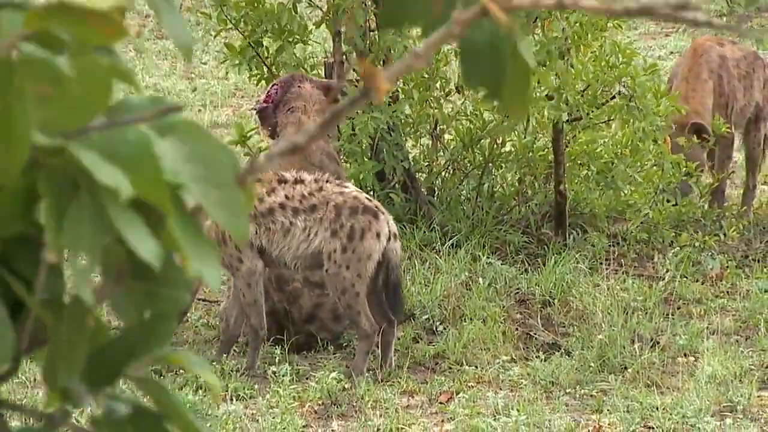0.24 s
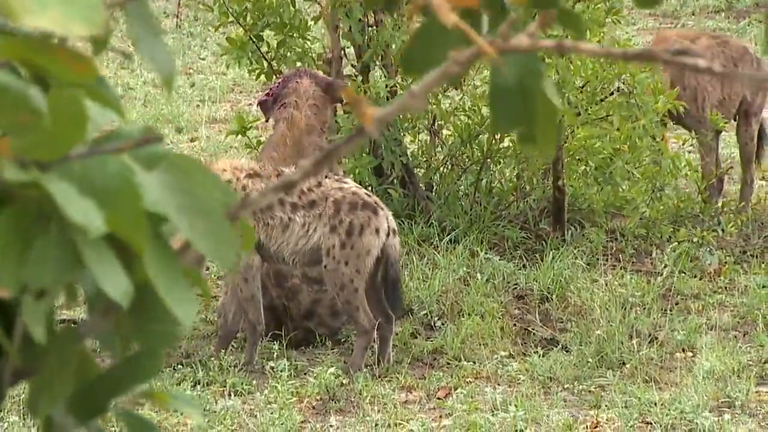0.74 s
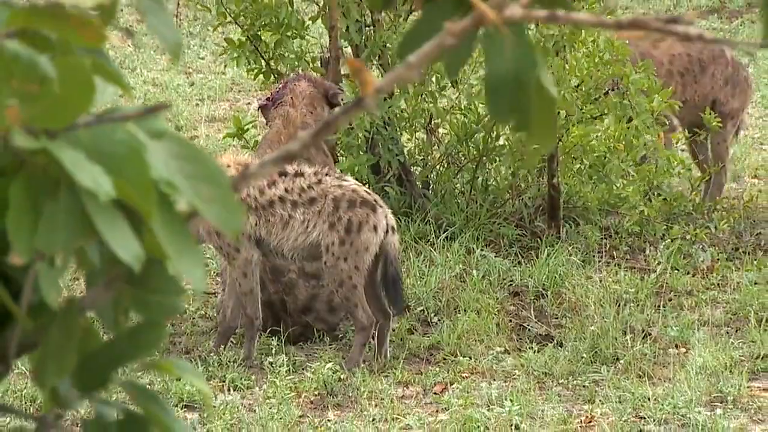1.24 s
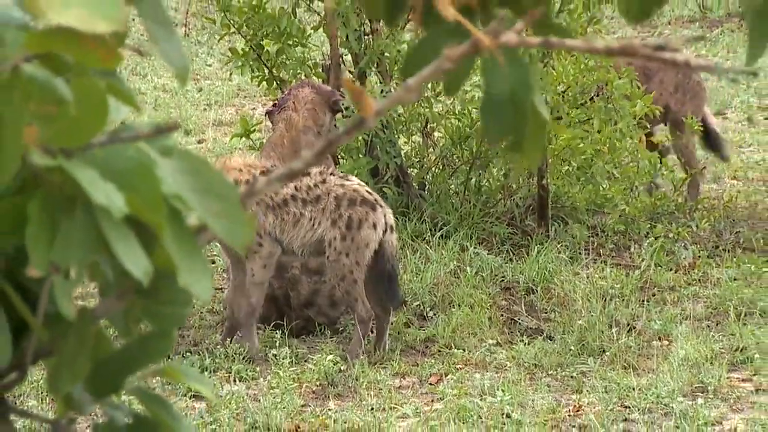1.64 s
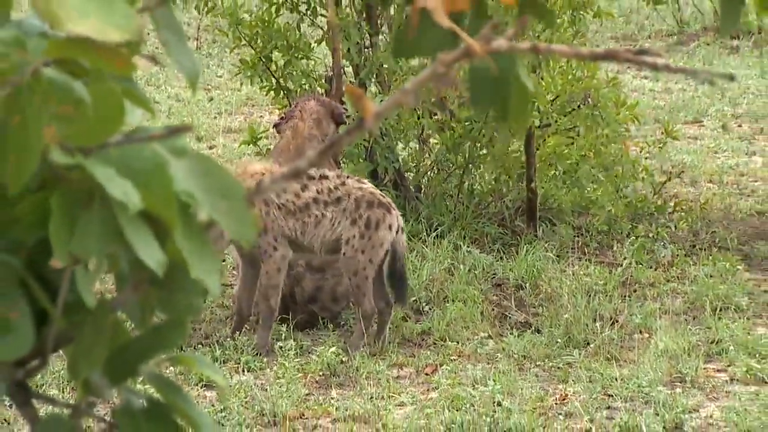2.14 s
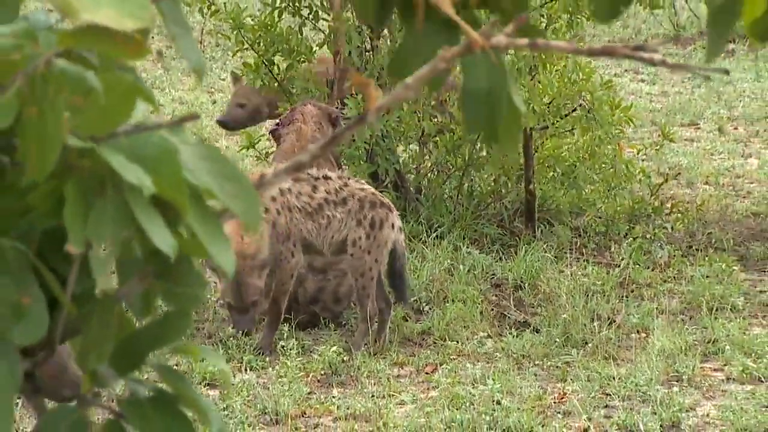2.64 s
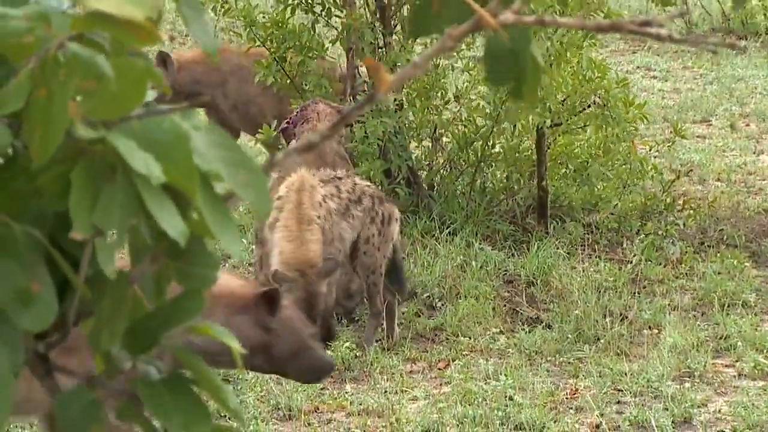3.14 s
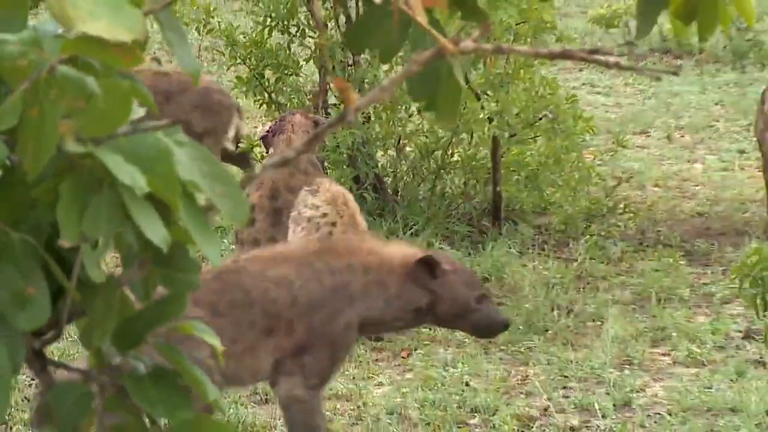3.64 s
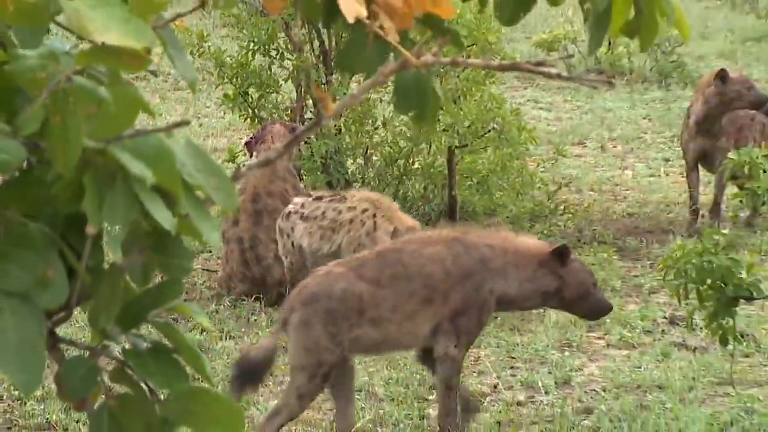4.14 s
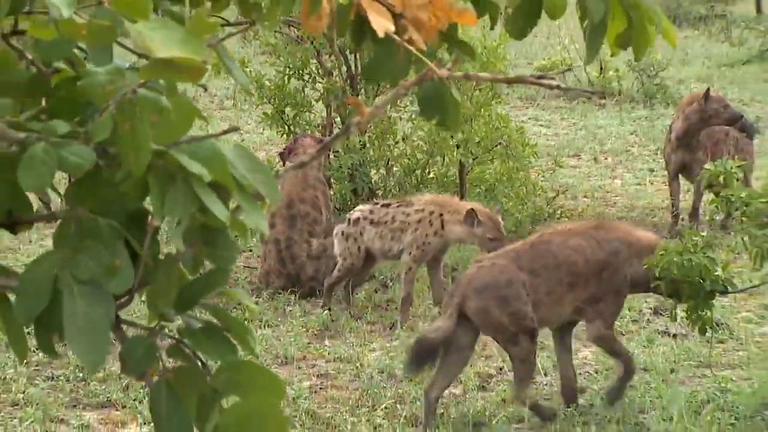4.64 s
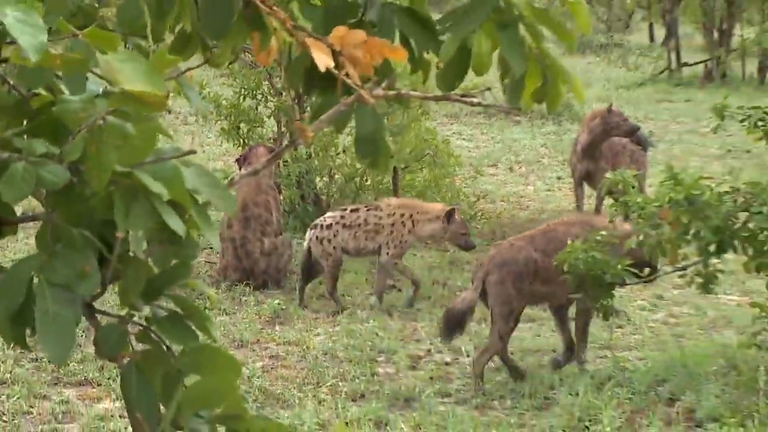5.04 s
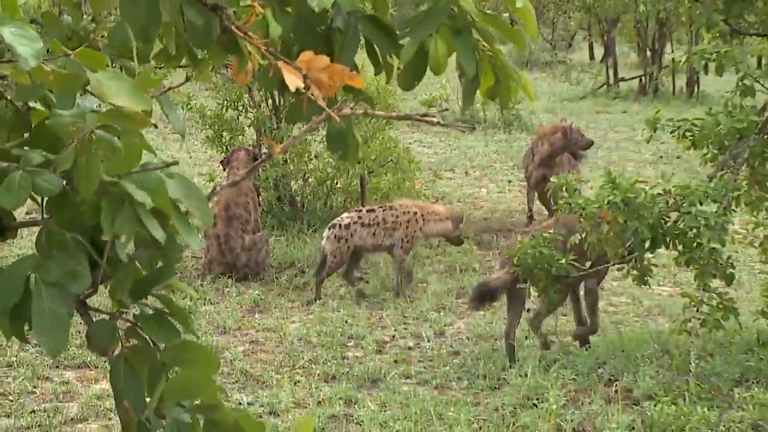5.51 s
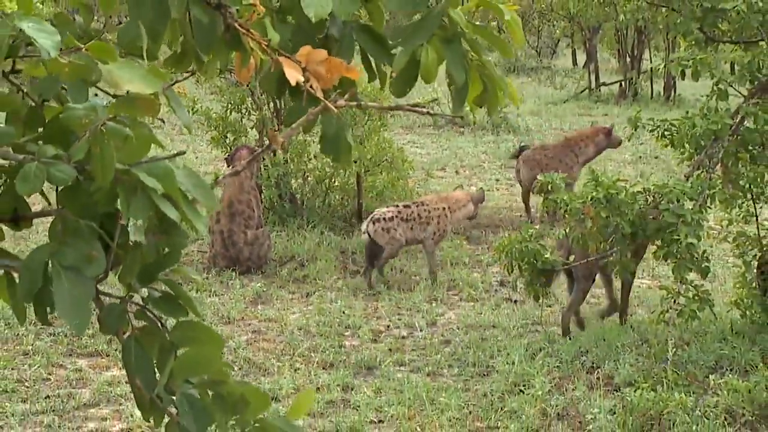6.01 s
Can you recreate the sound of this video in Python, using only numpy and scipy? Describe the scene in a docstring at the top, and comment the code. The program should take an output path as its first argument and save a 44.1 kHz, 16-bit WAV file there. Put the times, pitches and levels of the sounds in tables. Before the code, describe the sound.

A low vehicle rumble and soft breeze open outdoors with small knocks close to the microphone. At about one second a spotted hyena gives one long, very loud whoop, sliding up, holding a smooth, almost falsetto tone for well over a second, then dropping abruptly. A faint bird trill hides under its start. Afterwards bumps, taps, leaf rustle and a dry rasp come close, with a tiny chip and whistle.

```python
"""A spotted hyena gives one long whoop in open bush, close to a vehicle that rumbles low.
The call is a few partials that rise, hold on two nearly pure tones and drop; it drives the limiter.
Near the microphone noise bursts tap and gliding bumps thump; friction through resonances rasps at the end.
Small birds, set back by more echo, trill, chip and whistle as swept sines.
Behind them lie bands of flickering noise: rumble, breeze and leaves that rustle, hiss and crackle."""
import sys
import numpy as np
from scipy import signal
from scipy.io import wavfile
from scipy.ndimage import uniform_filter1d, minimum_filter1d

SR = 44100
rng = np.random.default_rng(int(sys.argv[2]) if len(sys.argv) > 2 else 0)


def persist_wave(psi):
    """Save psi, clipped to +-1, as 16-bit WAV."""
    counts = np.round(np.clip(psi, -1, 1) * 32767).astype(np.int16)
    wavfile.write(sys.argv[1], SR, np.atleast_2d(counts).T)


N = 276507
TIME = np.arange(N) / SR


def from_db(db):
    """Decibels to gain."""
    return 10 ** (np.asarray(db) / 20)


def rms_one(x):
    """Scale to rms 1."""
    return x / np.sqrt(np.mean(x ** 2) + 1e-20)


def in_time(rows):
    """Each column of a curve at every sample."""
    s, *columns = np.transpose(rows)
    return [np.interp(TIME, s, c) for c in columns]


def during(rows, fade_s=0.0073):
    """1 while a curve lasts, with short fades."""
    fade_in = np.clip((TIME - rows[0][0]) / fade_s, 0, 1)
    fade_out = np.clip((rows[-1][0] - TIME) / fade_s + 1, 0, 1)
    return fade_in * fade_out


def swells(rows):
    """For each level column, the gain of bell-shaped swells that add in power."""
    gains = []
    for k in range(2, len(rows[0])):
        power = sum(from_db(row[k]) ** 2 * np.exp(-2 * (2 * (TIME - row[0]) / row[1]) ** 2) for row in rows)
        gains.append(np.sqrt(power))
    return gains


def drift(rate):
    """Slow chance of rms 1: noise through a double low-pass; a higher rate (Hz) moves faster."""
    step = 40   # samples between the points that are joined by straight lines
    r = np.exp(-2 * step * np.pi * rate / SR)
    settle = 2000
    white = rng.standard_normal(N // step + settle + 2)
    slow = signal.lfilter([1], [1, -2 * r, r * r], white)[settle:]
    return np.interp(np.arange(N) / step, np.arange(len(slow)), rms_one(slow))


def band(x, low_hz, high_hz, order=2):
    """Butterworth band-pass."""
    edges_hz = [low_hz, min(high_hz, .45 * SR)]
    return signal.sosfilt(signal.butter(order, edges_hz, "band", fs=SR, output="sos"), x)


def resonance(x, hz, width_hz):
    """One resonance with gain 1 on top."""
    r = np.exp(-np.pi * width_hz / SR)
    feedback = [1, -2 * r * np.cos(2 * np.pi * hz / SR), r * r]
    return signal.lfilter(np.array([1, 0, -1]) * (1 - r * r) / 2, feedback, x)


def add(out, s, sound):
    """Mix a short sound in at a time."""
    at = int(s * SR)
    out[at:at + len(sound)] += sound[:N - at]


def coloured_noise(spectrum, patchy_db, flicker_rate):
    """Bands of noise up to half an octave wide, each flickering on its own; rms 1."""
    hz, level_db = np.transpose(spectrum)
    edges = np.geomspace(hz[0], hz[-1], int(2 * np.log2(hz[-1] / hz[0])) + 2)
    white, out = rng.standard_normal((2, N + SR)), 0
    for k, (low, high) in enumerate(zip(edges, edges[1:])):
        band_db = np.interp(np.log(low * high) / 2, np.log(hz), level_db)
        noise = band(white[k % 2], low, high, order=3)[SR:]   # the filter settles for a second first
        out = out + noise * from_db(band_db + patchy_db * drift(flicker_rate))
    return rms_one(out)


# colour that throat, mouth and ground give the partials as they glide: (frequency [Hz], gain [dB])
THROAT_COLOUR = [(235, -28.5), (325, -13), (385, -12), (470, -16), (530, -23), (755, -21), (792, -12.5),
                 (828, -9.5), (910, -46.5), (1120, -33.5), (1185, -38.5), (1230, -36), (1360, -28.5),
                 (1540, -52), (1650, -38.5)]


def throat_db(hz):
    """Gain of the throat at a frequency, straight lines over log frequency."""
    points_hz, db = np.transpose(THROAT_COLOUR)
    return np.interp(np.log(hz), np.log(points_hz), db)


# the whoop rises, holds and drops: (time [s], pitch [Hz])
WHOOP_PITCH = [(0.905, 236.5), (0.959, 248.5), (1.089, 313.6), (1.169, 352.2), (1.239, 375.4), (1.315, 384),
               (1.495, 395.4), (1.987, 403.2), (2.317, 413.1), (2.447, 412.6), (2.577, 409.8),
               (2.707, 392.5), (2.767, 375), (2.793, 336), (2.815, 296), (2.85, 215.8)]
# how hard the animal pushes: (time [s], level [dB])
WHOOP_EFFORT = [(0.92, -4), (1.03, -5), (1.125, 1), (1.175, -3.5), (1.24, 4.5), (1.34, 0.5), (1.48, 4.5),
                (2.55, 5), (2.77, -1.5), (2.84, -7)]
# thin overtones above the second partial: (time [s], level [dB])
OVERTONE_LEVEL = [(1.0, -4.5), (1.26, 2.5), (1.44, -6.5), (1.85, 2), (2.1, -1.5), (2.45, 1), (2.65, 0),
                  (2.77, -9.5)]
PARTIAL_DB_PER_OCTAVE = -6
# the limiter-like buzz grows as the call gets louder, by this much more than the call itself
BUZZ_DB, BUZZ_DB_PER_CALL_DB = -66.5, 1.24
BUZZ_FOLLOWS = .6   # share of the overtones' swing that the buzz takes


def hyena(jitter=0.00092, shimmer_db=0.09, air_db=-48, buzz_db_per_octave=-11, buzz_spread_db=6,
          buzz_flicker_db=1.5, order=4, count=28):
    """Four partials shaped by the throat and a little air, smooth and almost falsetto;
    with them a faint buzz at each crest, as of a limiter at work."""
    (pitch,), (effort_db,) = in_time(WHOOP_PITCH), in_time(WHOOP_EFFORT)
    (overtone_db,) = in_time(OVERTONE_LEVEL)
    cycles = np.cumsum(pitch * (1 + jitter * drift(40))) / SR
    phase = 2 * np.pi * cycles

    partial_db = [throat_db(k * pitch) + PARTIAL_DB_PER_OCTAVE * np.log2(k) + (k > 2) * overtone_db
                  for k in range(1, order + 1)]
    voice = sum(np.sqrt(2) * from_db(db) * np.cos(k * phase) for k, db in enumerate(partial_db, 1))

    first = order + 1
    buzz = sum(from_db(buzz_db_per_octave * np.log2(k / first)) * np.cos(k * phase)
               for k in range(first, count + 1))
    # the limiter-like buzz varies in strength from crest to crest
    strengths = rms_one(from_db(buzz_spread_db * np.minimum(rng.standard_normal(N), 2)))
    strength = strengths[np.round(cycles).astype(int)]
    buzz_db = BUZZ_DB + BUZZ_DB_PER_CALL_DB * effort_db + BUZZ_FOLLOWS * overtone_db
    buzz_db = buzz_db + buzz_flicker_db * drift(35)
    buzz = np.sqrt(2) * buzz * strength * from_db(buzz_db)

    # the air follows the first partial
    air = rms_one(band(rng.standard_normal(N), 330, 1700)) * from_db(partial_db[0] + air_db)
    # the call gives out as the pitch drops
    dying = np.clip((WHOOP_PITCH[-1][0] - TIME) / 0.023, 0, 1)
    push = from_db(effort_db + shimmer_db * drift(90))
    return (voice + buzz + air) * push * during(WHOOP_PITCH) * dying


# taps near the microphone: (time [s], clack level [dB], clack pitch [Hz],
# snap level [dB], snap pitch [Hz], length [share of the usual])
NEAR_TAPS = [(0.0395, -20.5, 580, -38, 4360, 1.2), (0.317, -45, 1400, -42.5, 7900, .8),
             (0.372, -33, 690, -66, 3000, 1.4), (0.42, -33.5, 990, -47.5, 3600, 1.2),
             (0.469, -26, 563, -61, 3000, 0.73), (1.3126, -7.5, 1000, -20, 4200, 1.18),
             (2.6001, -16.5, 916, -49.5, 4430, 0.9), (2.675, -11.5, 760, -30, 5170, 1.02),
             (3.533, -28, 480, -60, 2500, 0.55), (3.567, -26.5, 1700, -48, 2800, .25),
             (3.998, -23.5, 520, -41.5, 9000, 1.9), (4.145, -23, 527, -54, 7000, 2.4),
             (4.4475, -38, 900, -41, 7500, 1.1), (5.033, -25.5, 785, -59, 6000, 1.3),
             (5.129, -33, 1340, -56, 3000, 1.1), (5.251, -21, 1180, -46, 3400, 0.85),
             (5.3245, -20.5, 480, -43, 4000, 1.4), (5.5448, -17, 990, -46, 3480, 0.97),
             (5.701, -25, 1320, -52, 4000, 0.93), (5.741, -26.5, 680, -61, 3000, 1.9),
             (5.889, -18, 560, -38.5, 8000, 1.3)]


def taps(clack_t60=0.044, snap_t60=0.025, rise=0.0011, top_hz=11500):
    """Each tap is a bright snap of noise over a duller, longer clack; usual times in s."""
    out, t = np.zeros(N), np.arange(SR // 4) / SR
    for s, clack_db, clack_hz, snap_db, snap_hz, length in NEAR_TAPS:
        white = rng.standard_normal((2, len(t)))
        clack = rms_one(band(white[0], clack_hz / 2.05, clack_hz * 1.15))
        clack = clack * from_db(clack_db - 60 * t / (clack_t60 * length))
        snap = rms_one(band(white[1], snap_hz / 3.0, snap_hz * 1.2, order=1))
        snap = snap * from_db(snap_db - 60 * t / (snap_t60 * length))
        add(out, s, (clack + snap) * (1 - np.exp(-t / (rise * length))))
    return band(out, 100, top_hz, order=3)


# dull bumps near the microphone: (time [s], level [dB], first pitch before wobble [Hz],
# last pitch before wobble [Hz], length scale [s])
NEAR_THUMPS = [(0.033, -15, 412, 229, 0.021), (0.47, -24, 350, 208, 0.025), (1.316, -8, 342, 268, 0.013),
               (2.675, -20, 303, 245, 0.018), (3.531, -7, 240, 68, 0.014), (5.55, -19, 390, 267, 0.011),
               (6.051, -10.5, 270, 84.7, 0.02)]


def thumps(sag_s=0.00766, wobble=0.47, rattle_db=-9, rattle_t60=0.17):
    """A soft bump swings unevenly as its pitch sinks, and leaves a dull rattle of noise."""
    out, t = np.zeros(N), np.arange(SR // 6) / SR
    for s, db, first_hz, last_hz, length in NEAR_THUMPS:
        white = rng.standard_normal((2, len(t)))
        hz = last_hz + (first_hz - last_hz) * np.exp(-t / sag_s)
        hz = hz * (1 + wobble * rms_one(band(white[0], 42, 320)))
        swing = np.exp(-(t / (1.91 * length)) ** 3) * np.sin(2 * np.pi * np.cumsum(hz) / SR)
        rattle = rms_one(band(white[1], last_hz * 0.97, first_hz * 0.79))
        rattle = rattle * from_db(rattle_db - 60 * t / rattle_t60)
        add(out, s, from_db(db) * (rattle - swing) * (1 - np.exp(-t / 0.0035)))
    return out


# strokes of the rasp: (middle time [s], length [s], noise level [dB], thin ringing level [dB])
STROKES = [(5.15, 0.14, -38.5, -52), (5.245, 0.073, -34.5, -46), (5.36, 0.12, -37, -45),
           (5.82, .12, -40, -47), (5.915, 0.083, -32, -36), (6.0, 0.14, -31, -33), (6.17, 0.17, -37, -33.5)]
# its broad resonances: (frequency [Hz], base width, used doubled [Hz], relative level [dB])
BROAD_MODES = [(310, 74, -4), (530, 190, 0), (713, 67, -4), (1132, 140, -2.5), (1370, 50, -21),
               (1750, 33, -4), (4600, 340, -27.5)]
# its ringing resonances: (frequency [Hz], width [Hz], relative level [dB])
RINGING_MODES = [(957, 61, 1.5), (1666, 55, -3.5), (1775, 46, -16)]


def rasp(grain_db=3):
    """Uneven friction noise colours broad resonances and makes three narrow ones ring."""
    noise_gain, ring_gain = swells(STROKES)
    friction = rng.standard_normal(N) * from_db(grain_db * drift(57))

    def ringing(hz, width_hz):
        """Friction noise twice through one resonance, for steeper skirts."""
        return resonance(resonance(friction, hz, width_hz), hz, width_hz)

    body = sum(from_db(db) * ringing(hz, 2 * width) for hz, width, db in BROAD_MODES)
    ring = sum(from_db(db) * ringing(hz, width) for hz, width, db in RINGING_MODES)
    return rms_one(body) * noise_gain + rms_one(ring) * ring_gain


# a small bird's trill sinks and fades from note to note
TRILL_S, TRILL_GAP_S = .858, .05
TRILL_HZ, TRILL_DB = 2880, -51
TRILL_SAG_HZ_PER_S, TRILL_FADE_DB_PER_S = 950, 28
# one high chip: (time [s], level [dB], pitch [Hz])
HIGH_CHIP = (5.383, -45.5, 7070)
# a bird's whistle falls quickly, then levels off
WHISTLE_S, WHISTLE_LENGTH_S, WHISTLE_DB = 5.525, 0.17, -51
WHISTLE_FIRST_HZ, WHISTLE_LAST_HZ, WHISTLE_FALL_S = 3900, 2250, .055


def birds(note_s=0.014, sweep=.12, warble=0.033, echo_s=0.016, echo_db=-4, flutter_db=4.0, count=7):
    """Quick, burry down-swept sine notes, each with an echo, and one falling whistle."""
    out, along = np.zeros(N), np.linspace(0, 1, int(note_s * SR))
    trill = [(TRILL_S + t, TRILL_DB - TRILL_FADE_DB_PER_S * t, TRILL_HZ - TRILL_SAG_HZ_PER_S * t)
             for t in TRILL_GAP_S * np.arange(count)]
    for s, db, hz in trill + [HIGH_CHIP]:
        burr = rms_one(band(rng.standard_normal(len(along)), 80, 500))
        glide = 1 + sweep * (.5 - along) + warble * burr
        note = from_db(db) * np.sin(np.pi * along) * np.sin(2 * np.pi * np.cumsum(hz * glide) / SR)
        add(out, s, note)
        add(out, s + echo_s, note * from_db(echo_db))

    t = np.clip(TIME - WHISTLE_S, 0, WHISTLE_LENGTH_S)
    hz = WHISTLE_LAST_HZ + (WHISTLE_FIRST_HZ - WHISTLE_LAST_HZ) * np.exp(-t / WHISTLE_FALL_S)
    arch = np.sqrt(np.abs(np.sin(np.pi * t / WHISTLE_LENGTH_S)))
    gain = from_db(WHISTLE_DB + flutter_db * drift(40)) * arch
    return out + gain * np.sin(2 * np.pi * np.cumsum(hz * (1 + 0.012 * drift(119))) / SR)


def bush_echo(x, t60=0.63, build_up_s=0.085):
    """Trunks and thickets scatter back a thin tail that builds up, then dies away."""
    t = np.arange(SR) / SR
    tail = band(rng.standard_normal(SR), 280, 2300) * from_db(-60 * t / t60) * np.clip(t / build_up_s, 0, 1)
    return signal.fftconvolve(x, tail / np.sqrt(np.sum(tail ** 2)))[:N]


# the vehicle's low colour: (frequency [Hz], relative level per Hz [dB])
RUMBLE_SPECTRUM = [(11, -30), (18, -1), (59, 2.5), (107, -5), (166, -16.5), (220, -16), (290, -39),
                   (480, -120)]
# the steady rumble: (time [s], level [dB])
STEADY_RUMBLE = [(0, -26.5), (0.8, -29.5), (1.9, -28.5), (2.5, -32.5), (2.9, -27.5), (5.2, -27),
                 (6.2, -27.5)]
# low surges over it: (middle time [s], length [s], level [dB])
RUMBLE_SURGES = [(0.145, 0.034, -21.5), (2.9, 0.11, -24), (3.22, 0.21, -20), (3.89, 0.11, -25.5),
                 (4.13, 0.2, -24), (4.67, 0.046, -25), (4.9, 0.072, -23.5), (5.3, 0.16, -23)]


def vehicle_rumble(lumpy_db=1.5):
    """Low noise from the vehicle close by, slowly uneven, with surges added in power."""
    (rumble_db,), (surge,) = in_time(STEADY_RUMBLE), swells(RUMBLE_SURGES)
    gain = np.hypot(from_db(rumble_db + lumpy_db * drift(3.5)), surge)
    return gain * coloured_noise(RUMBLE_SPECTRUM, patchy_db=0.5, flicker_rate=4.9)


# colour of the breeze: (frequency [Hz], relative level per Hz [dB])
BREEZE_SPECTRUM = [(76, -26.5), (130, -1), (167, -6), (254, -4.5), (362, -10), (471, -9.5), (663, -17),
                   (862, -20), (1350, -26), (1940, -36.5), (3000, -46), (3900, -73), (6600, -120)]
# the breeze in the bush: (time [s], level [dB])
BREEZE_IN_TIME = [(0, -39), (0.9, -38.5), (3.2, -35.5), (3.7, -35.5), (4.05, -31), (4.6, -34.5),
                  (5.7, -32.5), (6.0, -27.5), (6.27, -33)]


def breeze():
    """Moving air in the bush: patchy noise of low and middle pitch."""
    (breeze_db,) = in_time(BREEZE_IN_TIME)
    return from_db(breeze_db) * coloured_noise(BREEZE_SPECTRUM, patchy_db=2.3, flicker_rate=14)


CRACKLES_PER_S, CRACKLE_DB = 100, -8   # level against the rustle's swell


def crackle(spread_db=4, low_hz=1800, high_hz=11000):
    """Dry leaves tick: tiny random bursts of noise of uneven size; rms 1."""
    size = from_db(spread_db * np.minimum(rng.exponential(1, N), 3))
    ticks = (rng.random(N) < CRACKLES_PER_S / SR) * size
    bursts = signal.lfilter([1], [1, -np.exp(-1 / (0.0007 * SR))], ticks + 1e-18)
    return rms_one(band(bursts * rng.standard_normal(N), low_hz, high_hz))


# colours of the leaves' rustle and fine hiss: (frequency [Hz], relative level per Hz [dB])
RUSTLE_SPECTRUM = [(1470, -25), (2500, -2), (2980, -3), (3240, -3.5), (3820, -5), (4620, -4.5), (4870, -2),
                   (5340, -6), (6650, -9), (8000, -9.5), (10400, -37), (17600, -120)]
HISS_SPECTRUM = [(4710, -29.5), (8000, 1), (10400, -3), (13600, -5.5), (15100, -10), (15600, -12)]
# leaves brush together: (middle time [s], length [s], rustle level [dB], fine hiss level [dB])
LEAF_BRUSHES = [(3.2, 0.5, -66, -71), (4.05, 0.38, -56, -60), (4.45, .25, -65.5, -69),
                (5.03, 0.21, -56.5, -64), (5.25, 0.21, -59, -67), (5.97, 0.42, -52, -63)]
# their light stirring in between: (time [s], rustle level [dB], fine hiss level [dB])
LEAF_STIRRING = [(0, -67, -70.5), (2.8, -65.5, -71), (6.2, -63, -68)]


def foliage(grain_db=1.0):
    """Leaves brush together: grainy rustle and fine hiss, with crackles in the swells."""
    rustle_db, hiss_db = in_time(LEAF_STIRRING)
    rustle_swell, hiss_swell = swells(LEAF_BRUSHES)
    rustle = coloured_noise(RUSTLE_SPECTRUM, patchy_db=2.2, flicker_rate=13)
    rustle = np.hypot(from_db(rustle_db), rustle_swell) * rustle
    hiss = coloured_noise(HISS_SPECTRUM, patchy_db=1.9, flicker_rate=14)
    hiss = np.hypot(from_db(hiss_db), hiss_swell) * hiss
    grain = from_db(grain_db * drift(250))
    return (rustle + hiss) * grain + from_db(CRACKLE_DB) * rustle_swell * crackle()


def scene():
    """The near whoop, taps, thumps and rasp, the farther birds with more echo, and the background."""
    whoop, song = hyena(), birds()
    echo = bush_echo(from_db(-27.0) * whoop + from_db(-17) * song)
    near = whoop + taps() + thumps() + rasp()
    background = vehicle_rumble() + breeze() + foliage()
    return (near + song + echo + background)[None]


LIMIT_DB, RELEASE_DB_PER_S = -6.5, 90   # limit against full scale
CUTOFF_HZ = 15600


def record(dry, attack_s=.003):
    """A peak limiter turns down just ahead of each crest and lets go slowly, so the call ducks the rest."""
    over_db = np.maximum(20 * np.log10(np.abs(dry) + 1e-9) - LIMIT_DB, 0)
    span = max(int(attack_s * SR), 1)
    release = RELEASE_DB_PER_S * TIME
    # the cut jumps up at a crest, then falls in a straight line of dB
    cut_db = np.maximum.accumulate(over_db + release, axis=-1) - release
    gain_db = uniform_filter1d(minimum_filter1d(-cut_db, 2 * span), 2 * span)
    # a steep low-pass ends the treble
    low_pass = signal.ellip(12, .1, 80, CUTOFF_HZ, fs=SR, output="sos")
    return signal.sosfilt(low_pass, dry * from_db(gain_db))


dry = scene()
out = record(dry)
persist_wave(out)
```